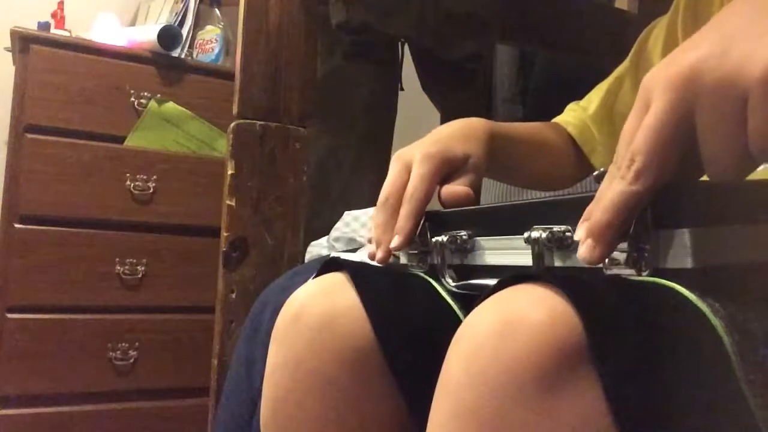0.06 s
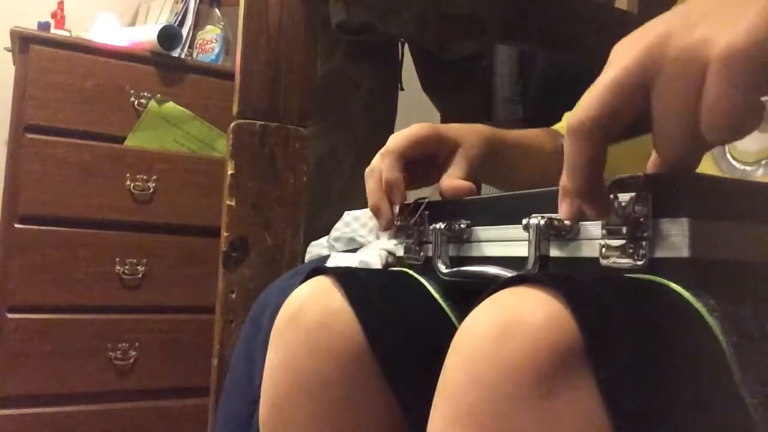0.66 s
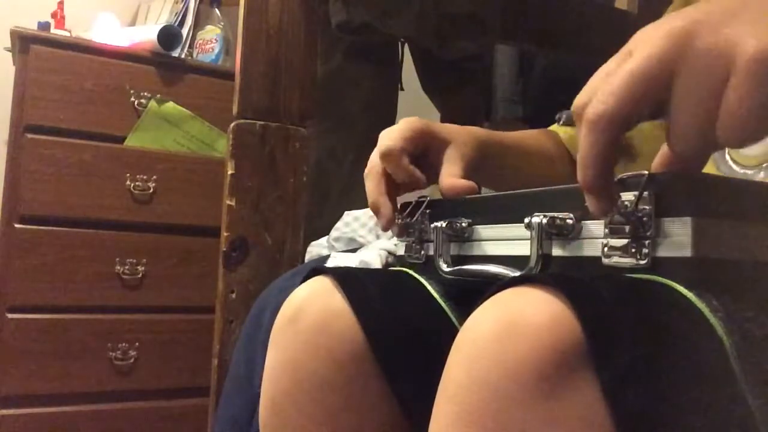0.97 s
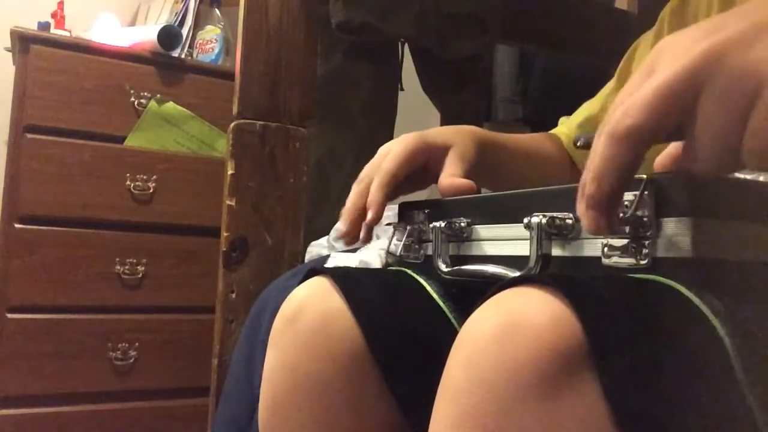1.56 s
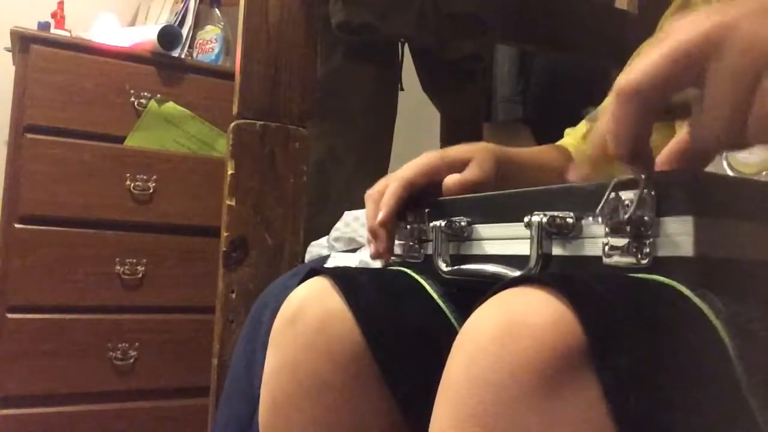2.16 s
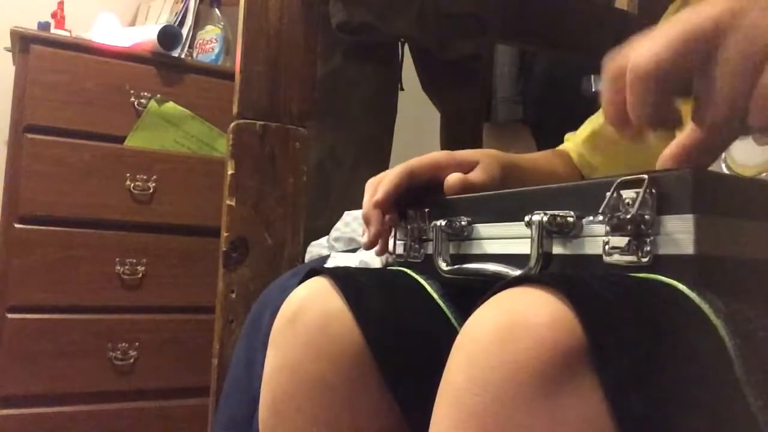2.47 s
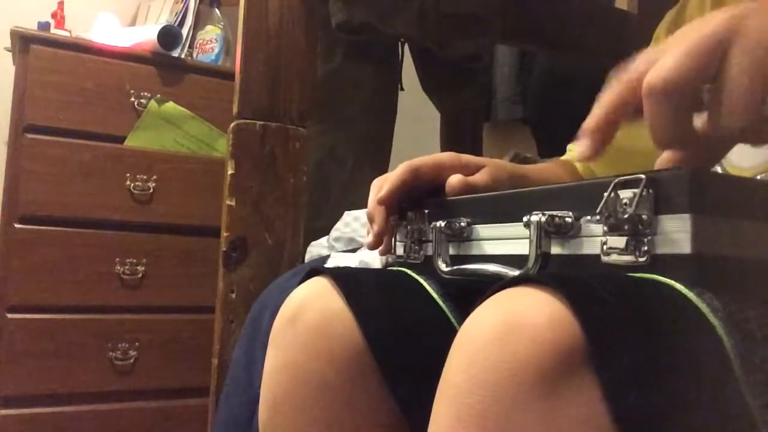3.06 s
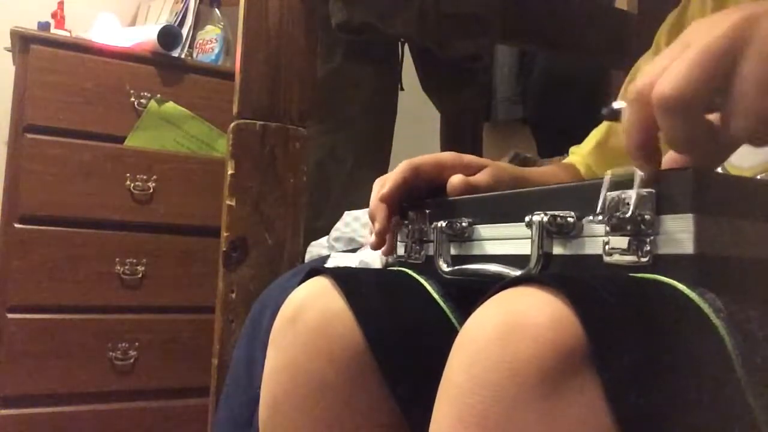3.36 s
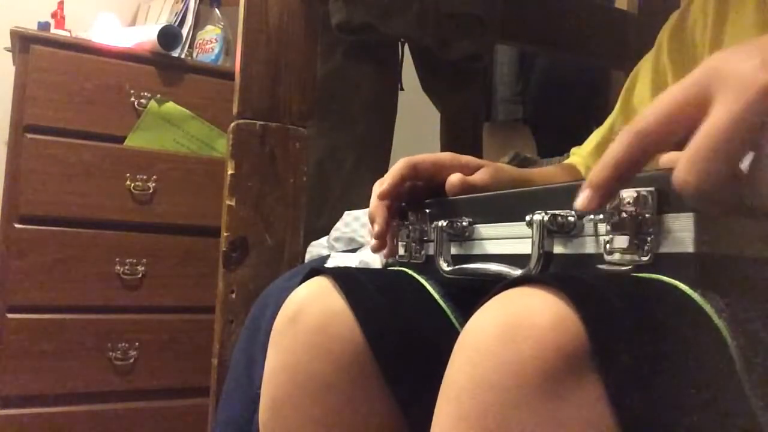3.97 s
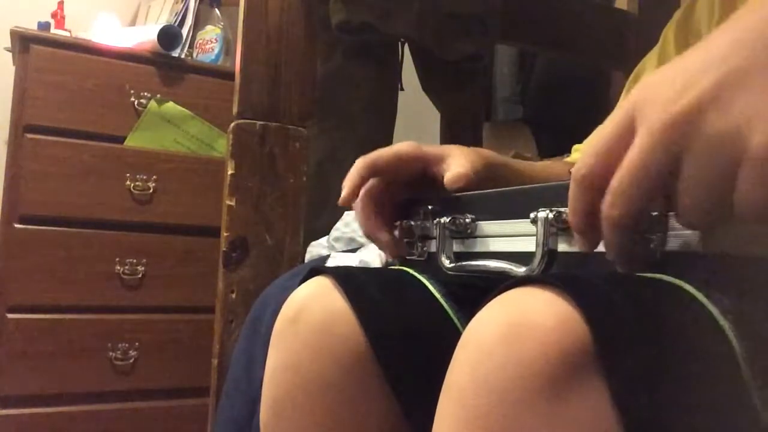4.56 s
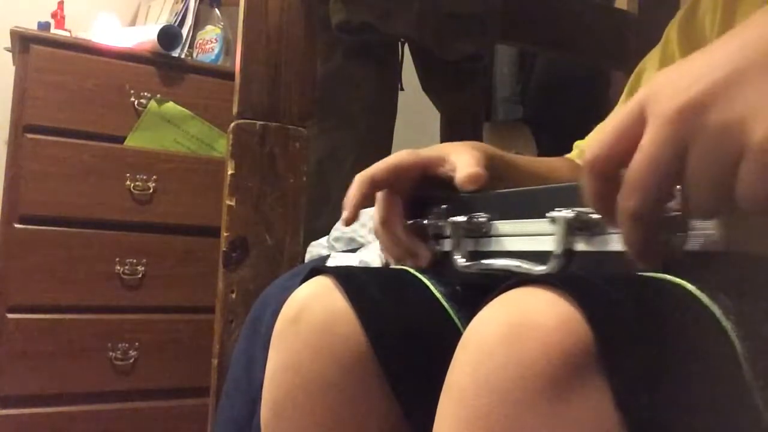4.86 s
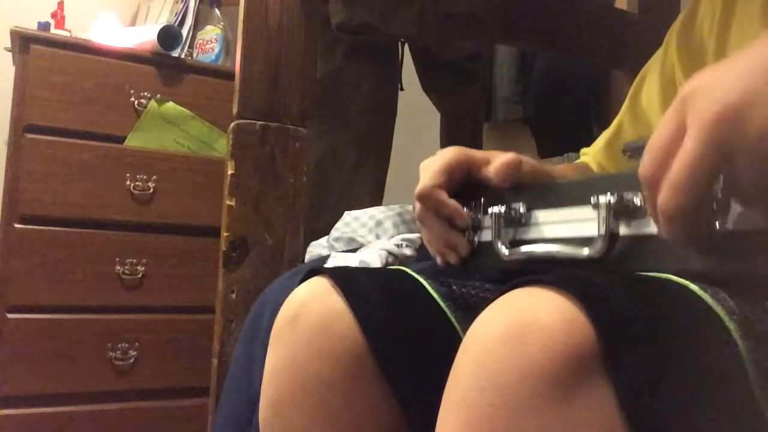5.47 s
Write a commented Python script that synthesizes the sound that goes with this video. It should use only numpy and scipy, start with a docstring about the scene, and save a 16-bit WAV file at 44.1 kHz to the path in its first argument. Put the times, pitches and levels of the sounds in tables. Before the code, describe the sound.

The metal latches of a small aluminium case are flicked open and shut close to the microphone. Light ticks and a soft knock lead to a sharp, briefly ringing snap, then more clicks and snaps follow at uneven intervals. Loose wire loops tick and scrape softly in between. After a last loud snap the case shifts with quiet knocks. The small room adds a short tail over faint hum and hiss.

```python
"""Sharp metal clicks and snaps: the latches of a small aluminium case, held on a lap, flick open and shut.
Each contact cracks, rattles briefly and rings the panels, frame and latch; loose wire loops tick and scrape.
A furnished bedroom adds a short tail, over faint hum and hiss."""
import sys
import numpy as np
from scipy import signal
from scipy.fft import rfft, irfft
from scipy.io import wavfile

SR = 44100
rng = np.random.default_rng(int(sys.argv[2]) if len(sys.argv) > 2 else 0)


def waveform_to_disk(signal):
    """Save audio, clipped to [-1, 1], as 16-bit WAV at the path in sys.argv[1]."""
    frames = np.transpose(np.atleast_2d(signal))
    scaled = np.clip(frames, -1, 1) * 32767
    samples = np.round(scaled).astype(np.int16)
    wavfile.write(sys.argv[1], SR, samples)


N = 247842
RING_S = np.arange(SR // 10) / SR   # time since contact

# latch hits: t/s, level/dB, hardness/dB, weight/dB, struck piece f/Hz, its share/dB
SNAPS = [(0.4706, -50, -5, -2, 1610, -4), (0.7583, -54, 7.5, 10, 4380, -1),
         (1.302, -47.5, 2.5, -1, 4890, -6), (1.4982, -24, -0.5, 2, 1900, -6.5),
         (2.285, -45, -7, -13, 2710, -18), (2.2907, -45.5, 0.5, -1, 2710, -1),
         (3.756, -50.5, 4, -2.5, 6350, -3), (3.8125, -28.5, 6.5, -4, 1017, -4),
         (4.4615, -36.5, -4, 1, 2330, -7), (4.512, -37.5, 9, -5.5, 4300, 2.5),
         (4.953, -25.5, -0.5, 2.5, 1790, -1)]
# lever or loop hits on the lid: columns as SNAPS
FLIPS = [(0.6798, -50.5, -0.5, -1, 3330, -4), (2.2324, -36, 3, 2, 1570, -21),
         (2.2355, -29.5, -0.5, -7, 1700, -4), (2.6, -48.5, -2, 2, 1990, -10),
         (2.9587, -35, -4, 3, 1100, 1.5), (2.9652, -47.5, -2.5, 5, 790, -9),
         (3.3596, -47.5, 0.5, 1.5, 5400, -2), (3.6904, -46, 2.5, -1, 2850, -4.5)]
# metal sliding on metal under the fingers: start/s, end/s, level/dB
SLIDES = [(0.751, 0.779, -46.5), (0.788, 1.3, -73.5), (1.286, 1.324, -58.5), (1.389, 1.526, -60),
          (3.739, 3.866, -50.5), (3.971, 4.51, -71), (4.84, 5.411, -70)]
# modes of case and fittings: f/Hz, level/dB, t60/s
MODES = [(233, -1.5, .05), (272.2, -5, 0.11), (405.2, 3, 0.064), (454, 4, 0.033), (539, -10.5, 0.1),
         (724, -2, 0.066), (825, 1, 0.038), (1073, -3.5, 0.061), (1405, -0.5, 0.061), (1556, 0, 0.03),
         (1800, -9, 0.042), (2150, -8.5, 0.029), (2790, -6.5, .035), (2960, -7.5, .035), (3270, -8, 0.044),
         (3720, -2, 0.032), (4036, -2, 0.038), (4380, -3, 0.032), (4890, -8, 0.019), (6310, -6.5, 0.05),
         (6050, -9, 0.046), (6840, -3.5, .025), (7630, -2, .025), (7580, -14, 0.014), (12200, -13.5, 0.057),
         (14300, -13.5, .02)]
# hard-contact spectrum: f/Hz, level/dB
CONTACT_SPECTRUM = [(80, -7), (160, -5.5), (260, 3.5), (420, 2), (650, -2), (950, -1.5), (1200, 2),
                    (1800, 5), (3000, 0.5), (4200, -0.5), (5400, -2), (8000, -8.5), (9500, -15),
                    (15000, -18)]


def latch_snaps(pulse):
    """Latches spring over centre and hit their plates."""
    return blows(pulse, SNAPS, parts_db=(-24, -9, 0.5, 1, -7), rattle_db=0, modes_db=-2, rise_s=0.00051)


def lever_flips(pulse):
    """A lever or loop flips against the lid, which booms."""
    return blows(pulse, FLIPS, parts_db=(-6.5, -4, 0.5, 1, -14), rattle_db=0, modes_db=0, rise_s=0.00051)


def case_knocks(pulse):
    """The case shifts under the hands with dull knocks."""
    # columns as SNAPS, then rattle t60/s
    knocks = [(0.369, -39, -3, -0.5, 810, 1, 0.052), (0.8024, -64, 0, 7, 460, -1, .022),
              (1.43, -47.5, -3, -5, 1660, 4, .022), (3.0397, -59.5, -4, 5, 623, -3, 0.025),
              (4.5852, -47.5, -1, -3.5, 780, 3, 0.083), (5.1473, -44.5, 2.5, 5.5, 380, -4.5, 0.016),
              (5.3686, -51, 3, 6, 414, -6, 0.026), (5.3917, -42.5, 2.5, -4.5, 1720, 10.5, 0.0091)]
    return blows(pulse, knocks, parts_db=(-6.5, 1, 0.5, -11.5, -27.5),
                 rattle_db=0.5, modes_db=0.5, rise_s=0.0004)


def blows(pulse, rows, parts_db, rattle_db, modes_db, rise_s):
    """One contact per row. Firm blows press the parts together and rattle less, unless a t60 is listed."""
    out = np.zeros(N)
    for start_s, db, hardness_db, weight_db, piece_hz, piece_db, *listed_t60_s in rows:
        # 20 ms at -37.5 dB, halved per 23.5 dB more
        rattle_t60_s = listed_t60_s[0] if listed_t60_s else 0.02 * 2 ** ((-37.5 - db) / 23.5)
        levels_db = part_levels_db(parts_db, db, hardness_db, weight_db)
        hit = contact(pulse, levels_db, piece_hz, piece_db, rattle_t60_s, rattle_db, modes_db, rise_s,
                      piece_t60_s=22 / piece_hz)   # 22 cycles
        add(out, start_s, hit)
    return out


def part_levels_db(parts_db, level_db, hardness_db, weight_db=0):
    """Hardness lifts latch and edges, weight lifts lid and panels."""
    # lid, panels, frame, latch, edges; a shorter parts_db means the last ones
    hardness_slope = np.array([0.019, 0.098, 0.012, 1.0, 0.79])
    weight_slope = np.array([1, 1, 0, 0, 0])
    tilt_db = hardness_db * hardness_slope + weight_db * weight_slope
    return level_db + np.array(parts_db) + tilt_db[-len(parts_db):]


def contact(pulse, levels_db, piece_hz, piece_db, rattle_t60_s, rattle_db, modes_db, rise_s,
            piece_t60_s=0.01, spread_db=1.5):
    """Crack, blur of micro-bounces and ring of case and struck piece, shared out among the parts."""
    # bands of lid, panels, frame, latch, edges: low/Hz, high/Hz
    part_bands = [(145, 320), (320, 700), (700, 2500), (2500, 8500), (8500, 16000)]
    hz, db, t60_s = np.transpose(MODES)
    gains = from_db(db + spread_db * rng.standard_normal(len(hz))) * rng.choice([-1, 1], len(hz))
    modes = gains @ ring(hz[:, None], t60_s[:, None])
    rise = 1 - np.exp(-RING_S / rise_s)
    rattle = coloured(CONTACT_SPECTRUM, len(RING_S)) * rise * decay(rattle_t60_s)
    sound = pulse + from_db(rattle_db) * unit_attack(rattle)
    sound += from_db(modes_db) * unit_attack(modes)
    sound += from_db(piece_db) * unit_attack(ring(piece_hz, piece_t60_s))
    return sum(from_db(part_db) * unit_attack(band(sound, *edges_hz, order=3))
               for part_db, edges_hz in zip(levels_db, part_bands[-len(levels_db):]))


def hard_pulse():
    """Crack of a hard contact: minimum phase, so the energy comes first."""
    size = len(RING_S)
    magnitude = from_db(at_hz(CONTACT_SPECTRUM, np.fft.rfftfreq(size, 1 / SR)))
    cepstrum = irfft(np.log(magnitude), size)
    cepstrum[1:size // 2] *= 2
    cepstrum[size // 2:] = 0
    return unit_attack(irfft(np.exp(rfft(cepstrum)), size))


def loop_rings():
    """A freed wire loop sings on after a hard snap."""
    # t/s, f/Hz, level/dB, t60/s
    tones = [(1.4984, 7680, -40, .15), (1.4984, 10320, -43, .19), (3.8127, 10650, -49, .19),
             (4.9529, 7850, -44, .07)]
    out = np.zeros(N)
    for start_s, hz, db, t60_s in tones:
        add(out, start_s, from_db(db) * ring(hz, t60_s, np.arange(SR // 4) / SR))
    return out


def loop_bounces(pulse, gain_db=-1.5, loss_db=8.5, gap_ratio=0.84):
    """Loose loops drop and bounce, each time weaker and sooner."""
    # t/s, level/dB, hardness/dB, f/Hz, first gap/s
    drops = [(0.3277, -68, 3.5, 7400, .004), (0.451, -48.5, -7.5, 1880, .003),
             (0.771, -66, -4, 4540, 0.018), (1.0146, -52.5, -3, 1960, 0.022),
             (1.1432, -54.5, 1.5, 4020, 0.015), (1.4479, -49.5, 3, 5300, .009),
             (1.534, -49.5, 7, 7700, 0.026), (1.991, -61, 5, 6160, 0.014), (2.998, -50, -3, 2770, 0.0089),
             (3.4078, -52.5, 2, 3990, 0.038), (3.7402, -61.5, 6.5, 5050, .0156),
             (3.7733, -48, 1, 5060, 0.0095), (3.8313, -42, 3.5, 4600, 0.012),
             (3.8442, -48.5, 3, 4720, 0.014), (4.122, -61.5, 1.5, 3300, 0.0071),
             (4.1645, -58.5, -6, 1500, .004), (4.2279, -55.5, 0.5, 3700, 0.037),
             (4.3457, -50, -2, 4180, 0.0096), (4.383, -58, -2.5, 4420, .004), (4.419, -58, -2, 1820, .021),
             (4.4805, -62, -3, 2030, 0.013), (5.3328, -57.5, 0.5, 5400, 0.022)]
    out = np.zeros(N)
    for at_s, db, hardness_db, hz, gap_s in drops:
        for k in range(3):
            add(out, at_s, tick(pulse, db - loss_db * k, hardness_db, hz))
            at_s += gap_s * gap_ratio ** k
    return from_db(gain_db) * out


def tick(pulse, level_db, hardness_db, piece_hz):
    """One touch of a loop, too light to move lid or panels."""
    levels_db = part_levels_db((-1.5, 1, -8), level_db, hardness_db)
    return contact(pulse, levels_db, piece_hz, piece_db=-0.5, rattle_t60_s=0.036,
                   rattle_db=1.5, modes_db=5.5, rise_s=0.0023)


def scrapes(pulse, slips_per_s=600, spread_db=3, delay_s=0.013, chatter_s=0.052, chatter_db=-30):
    """Dense, uneven micro-slips ring the metal: slides, and chatter after each snap and flip."""
    slips = (rng.random(N) < slips_per_s / SR).astype(float)
    slips *= from_db(spread_db * np.minimum(rng.exponential(1, N), 4))
    slips *= rng.choice([-1, 1], N)
    metal = sum((-1) ** k * from_db(db) * ring(hz, t60_s) for k, (hz, db, t60_s) in enumerate(MODES))
    grain = signal.fftconvolve(slips, pulse + unit_attack(metal))[:N]
    grain = unit_rms(band(grain, low_hz=700, high_hz=8500, order=3))
    chatter = [(s + delay_s, s + delay_s + chatter_s, db + chatter_db) for s, db, *_ in SNAPS + FLIPS]
    t = np.arange(N) / SR
    envelope = np.zeros(N)
    for start_s, end_s, db in SLIDES + chatter:
        progress = np.clip((t - start_s) / (end_s - start_s), 0, 1)
        envelope += from_db(db) * np.sqrt(np.abs(np.sin(np.pi * progress)))
    return grain * envelope


def stray_touches(pulse, rate_per_s=11, above_slide_db=2.5, spread_db=3):
    """Sliding loops tick softly at uneven times."""
    out = np.zeros(N)
    for start_s, end_s, slide_db in SLIDES:
        count = int((end_s - start_s) * rate_per_s)
        for k in range(count):
            at_s = start_s + (end_s - start_s) * (k + rng.random()) / count
            db = slide_db + above_slide_db + spread_db * rng.standard_normal()
            add(out, at_s, tick(pulse, db, hardness_db=-4.5, piece_hz=rng.uniform(1500, 4370)))
    return out


def bedroom(x, first_echo_s=0.0033, build_s=0.0018, spread_db=3.5):
    """Echoes off near furniture thicken into a short tail that dies band by band."""
    # f/Hz, level/dB, t60/s
    room = [(150, -16, 0.27), (400, -12, 0.18), (1010, -10, 0.12), (2000, -10.5, 0.099), (4560, -11, 0.13),
            (8000, -8.5, 0.11), (15000, -13, 0.11)]
    t = np.arange(SR // 2) / SR
    onset = 1 - np.exp(-np.maximum(t - first_echo_s, 0) / build_s)
    echoes = rng.standard_normal((2, len(t))) * from_db(spread_db * rng.standard_normal((2, len(t))))
    edges_hz = np.geomspace(100, 17000, 13)
    response = np.zeros(len(t))
    for k, (low_hz, high_hz) in enumerate(zip(edges_hz, edges_hz[1:])):
        hz = np.sqrt(low_hz * high_hz)
        tail = band(echoes[k % 2] * onset * decay(at_hz(room, hz, column=2), t), low_hz, high_hz)
        tail *= np.sqrt(2 * (high_hz - low_hz) / SR / np.sum(tail ** 2))   # unit gain in band
        response += from_db(at_hz(room, hz)) * tail
    return signal.fftconvolve(x, response)[:N]


def hum(waver_db=1.0, wander_hz=1.5):
    """An appliance hums, wavering slightly in level and pitch."""
    # f/Hz, rms level/dB
    lines = [(99, -77), (120, -90), (217, -78.5), (239, -75.5), (424, -83)]
    out = np.zeros(N)
    for hz, db in lines:
        peak = np.sqrt(2) * from_db(db - waver_db * drift(rate_hz=3.4))
        cycles = np.cumsum(hz + wander_hz * drift(rate_hz=8.7)) / SR
        out += peak * np.sin(2 * np.pi * cycles)
    return out


def hiss(rms_db=-64):
    """Soft, steady background noise."""
    # f/Hz, relative density/dB
    spectrum = [(15, -44.5), (25, -18), (102, -7), (190, -11.5), (229, -0.5), (263, -10), (439, -10.5),
                (531, -16), (677, -12), (796, -15.5), (1230, -18.5), (1650, -22), (3250, -24.5),
                (14800, -43.5), (16000, -58)]
    return from_db(rms_db) * coloured(spectrum, N)


def from_db(db):
    return 10 ** (np.asarray(db) / 20)


def unit_rms(x):
    return x / np.sqrt(np.mean(x ** 2) + 1e-20)


def unit_attack(x):
    """Scale to rms 1 over the first 10 ms."""
    return x / np.sqrt(np.mean(x[:SR // 100] ** 2) + 1e-20)


def decay(t60_s, t=RING_S):
    return np.exp(-np.log(1000) * t / t60_s)


def ring(hz, t60_s, t=RING_S):
    """Struck mode, amplitude 1."""
    return np.sin(2 * np.pi * hz * t) * decay(t60_s, t)


def at_hz(points, hz, column=1):
    """Interpolate a column over log frequency."""
    table = np.array(points, float)
    return np.interp(np.log(np.maximum(hz, 1)), np.log(table[:, 0]), table[:, column])


def band(x, low_hz, high_hz, order=2):
    """Causal band-pass."""
    sos = signal.butter(order, [low_hz, high_hz], "band", fs=SR, output="sos")
    return signal.sosfilt(sos, x + 1e-18)


def coloured(spectrum, size):
    """Shaped noise, rms 1."""
    gain = from_db(at_hz(spectrum, np.fft.rfftfreq(size, 1 / SR)))
    return unit_rms(irfft(rfft(rng.standard_normal(size)) * gain, size))


def drift(rate_hz):
    """Slow random curve, spread about 1."""
    knots = rng.standard_normal(2000)
    return np.interp(np.arange(N) / SR * rate_hz, np.arange(len(knots)), knots)


def add(out, start_s, sound):
    start = max(round(start_s * SR), 0)
    out[start:start + len(sound)] += sound[:N - start]


def scene():
    """Close case, room tail and background; mono."""
    pulse = hard_pulse()
    case = latch_snaps(pulse) + lever_flips(pulse) + case_knocks(pulse)
    case += loop_rings() + loop_bounces(pulse) + scrapes(pulse) + stray_touches(pulse)
    return (case + bedroom(case) + hum() + hiss())[None]


def record(dry):
    """Steep low-pass at 16 kHz."""
    return signal.sosfilt(signal.ellip(10, 0.2, 75, 16000, fs=SR, output="sos"), dry)


dry = scene()
out = record(dry)
waveform_to_disk(out)
```